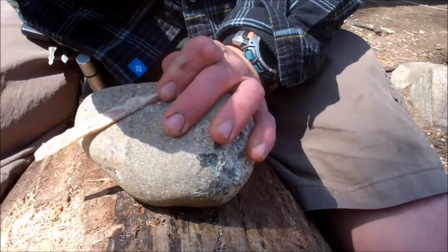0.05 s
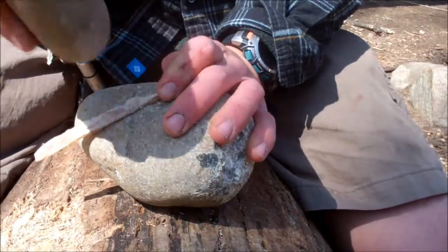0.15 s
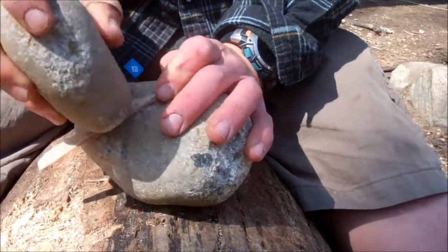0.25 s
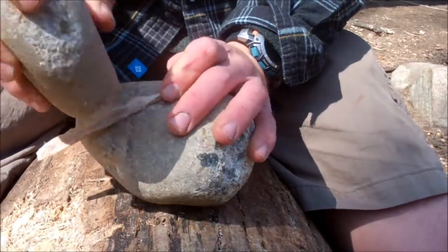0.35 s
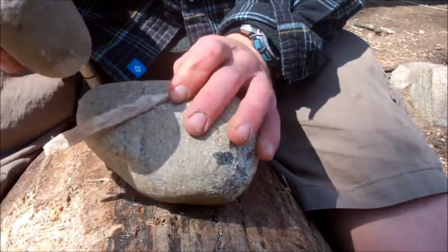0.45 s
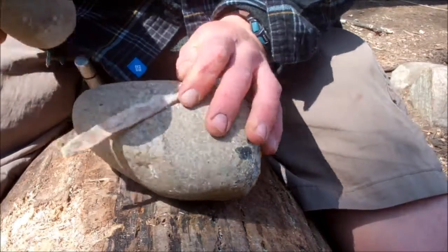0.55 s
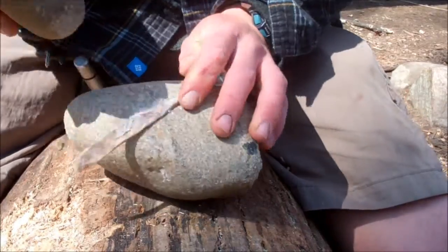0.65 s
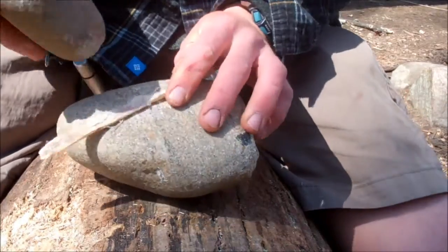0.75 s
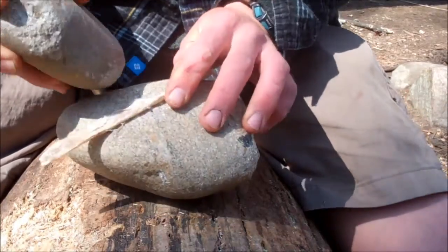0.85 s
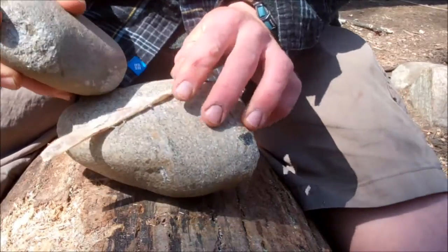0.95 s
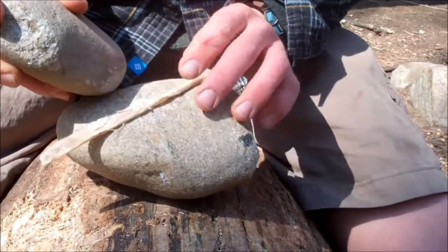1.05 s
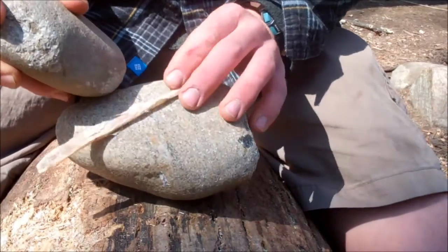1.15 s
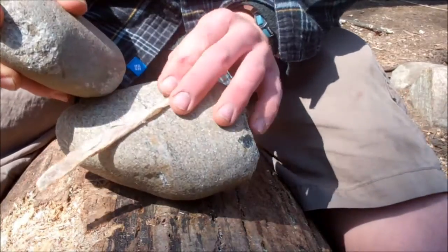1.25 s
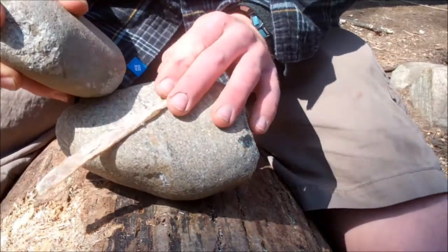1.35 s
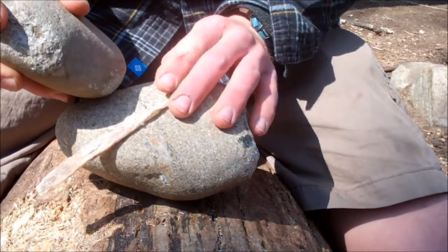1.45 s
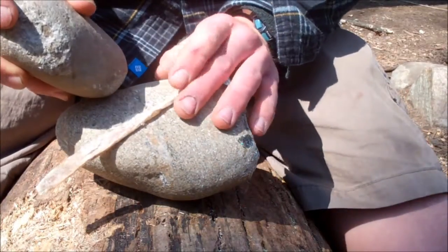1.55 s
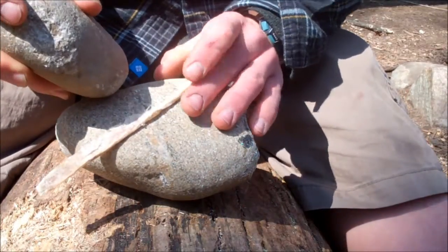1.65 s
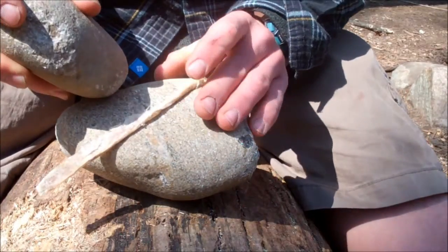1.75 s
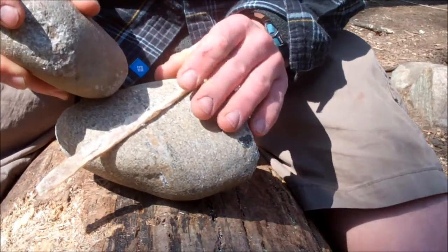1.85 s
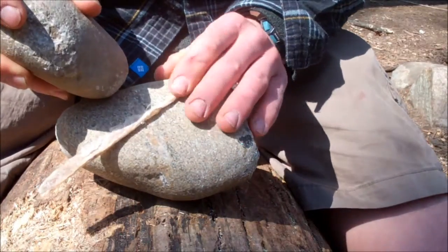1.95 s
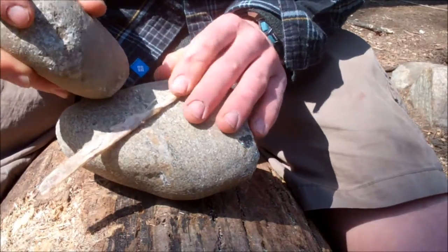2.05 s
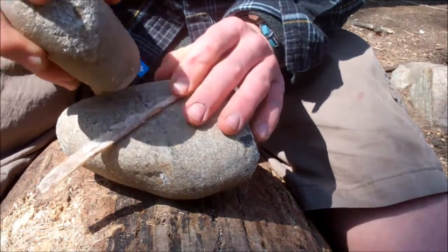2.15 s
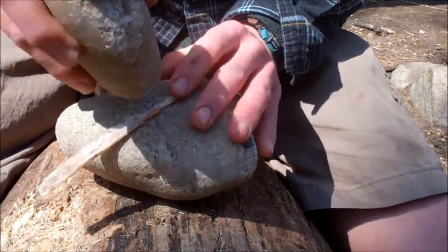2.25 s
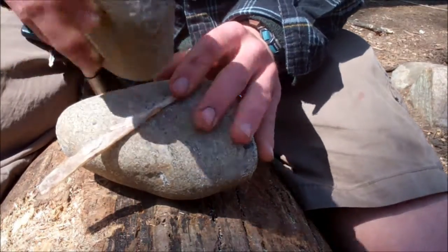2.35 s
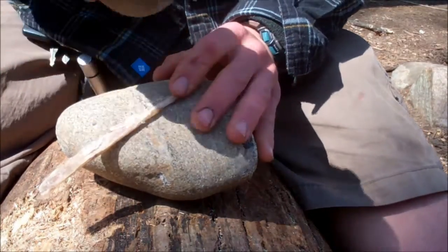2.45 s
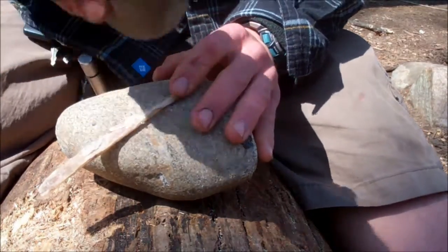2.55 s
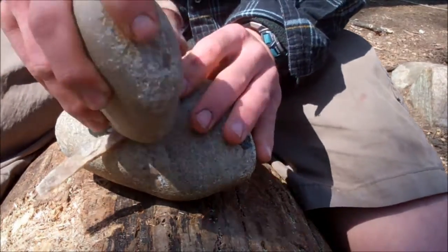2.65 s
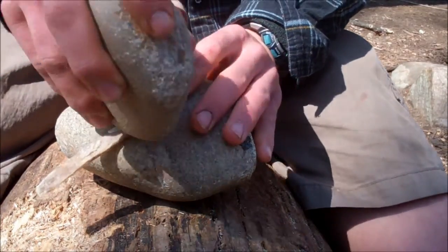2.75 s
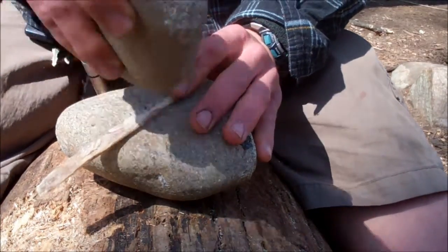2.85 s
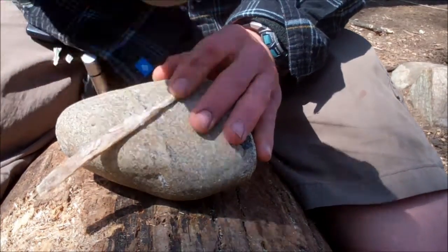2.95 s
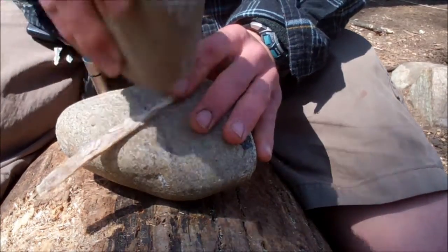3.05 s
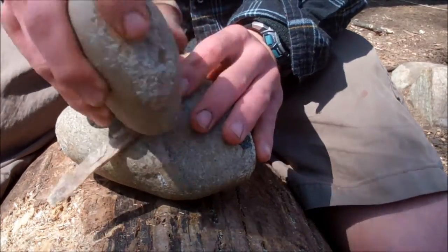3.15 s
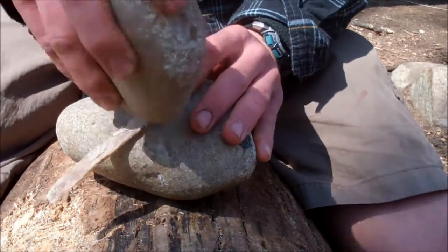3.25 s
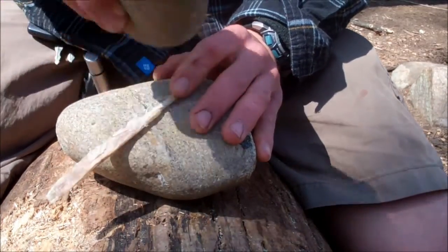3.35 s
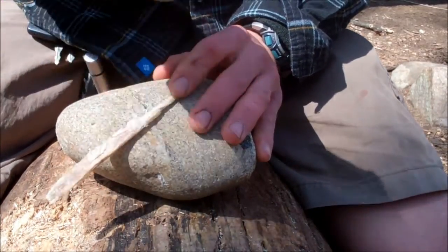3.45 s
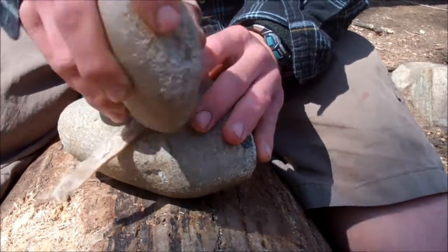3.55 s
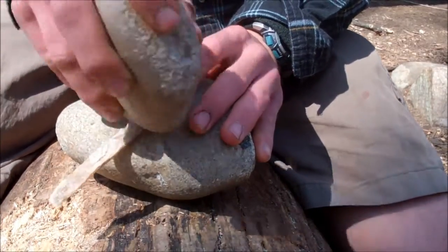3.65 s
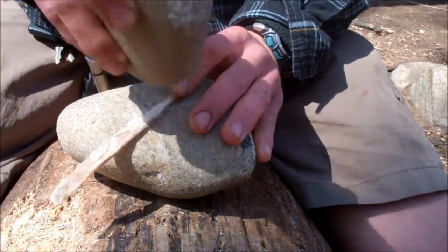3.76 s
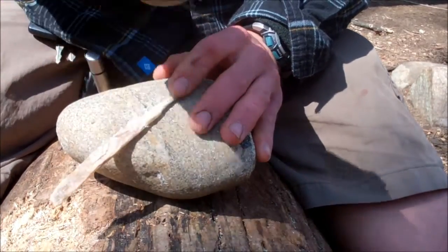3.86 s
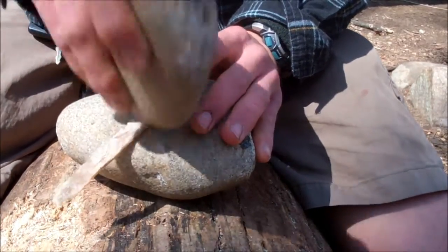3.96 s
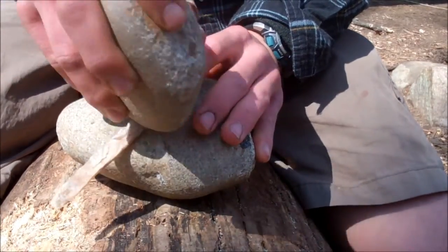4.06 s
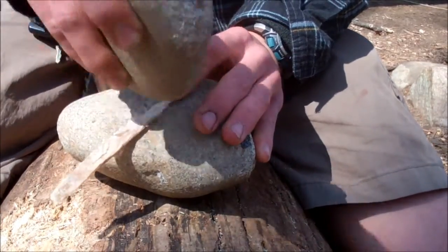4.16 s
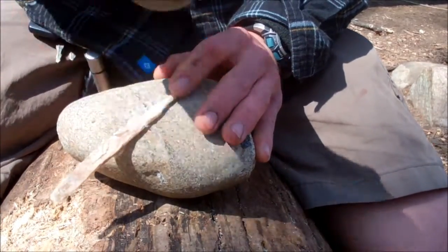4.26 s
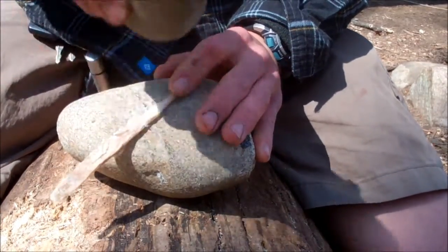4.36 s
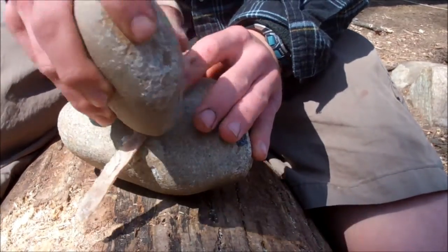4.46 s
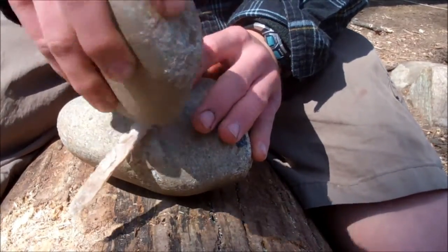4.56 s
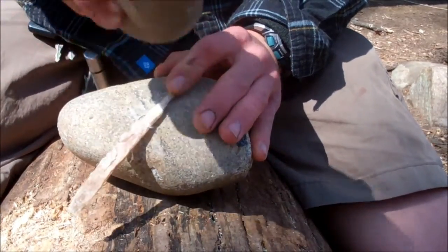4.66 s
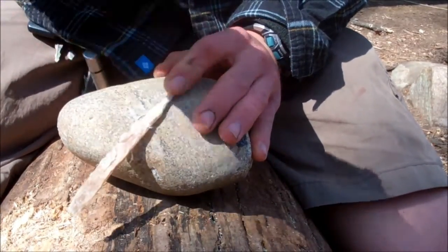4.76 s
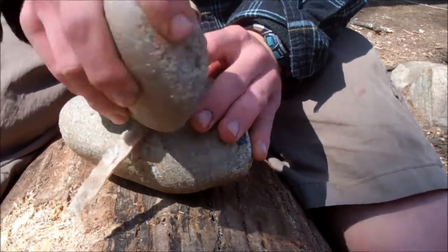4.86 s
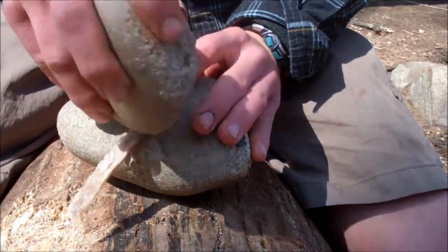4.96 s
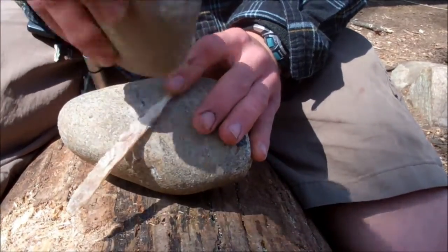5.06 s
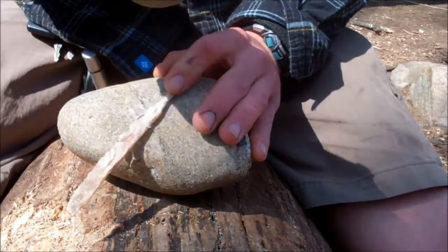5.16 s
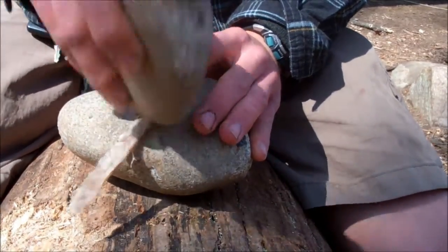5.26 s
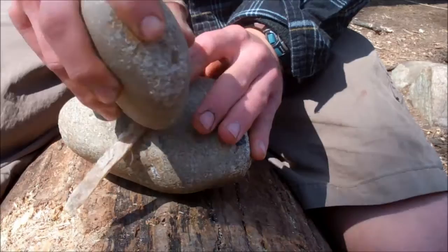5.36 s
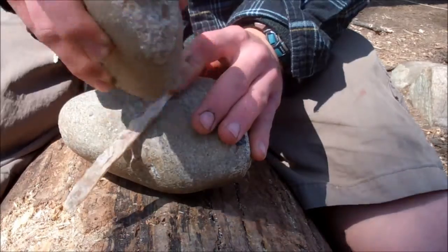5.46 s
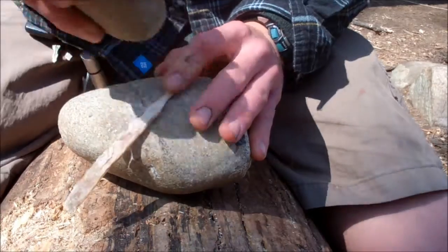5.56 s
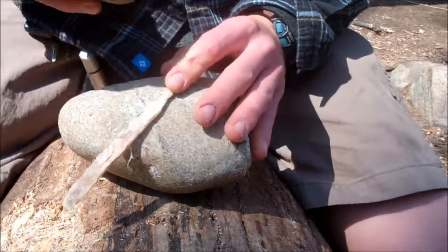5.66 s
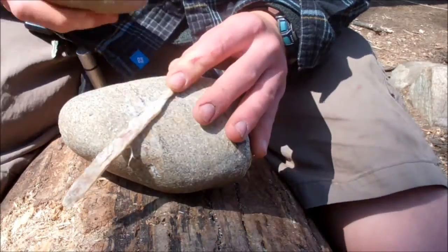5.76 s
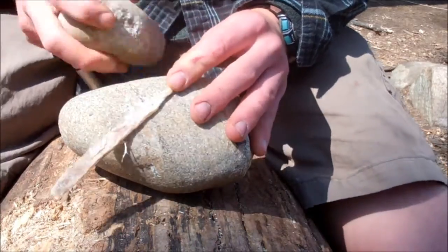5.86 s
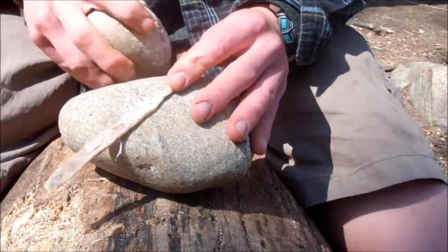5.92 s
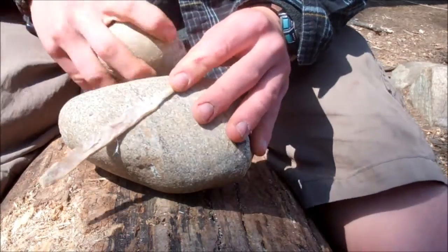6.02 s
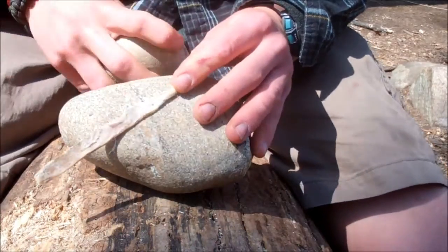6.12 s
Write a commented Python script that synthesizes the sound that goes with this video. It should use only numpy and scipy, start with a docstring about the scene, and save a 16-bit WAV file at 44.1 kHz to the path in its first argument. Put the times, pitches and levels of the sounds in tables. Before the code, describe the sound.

Outdoors, hard overloaded stone knocks with a crunchy edge and short hollow log thump. After an early blow and a small high clack comes a quiet gap of sleeve rustle, fine ticks and faint squeaks, then steady pounding until just past five seconds. Close microphone, almost no reverberation, low wind and soft distant rushing behind, ducking under the blows.

```python
"""Pounding sinew outdoors

A hand stone pounds a strip of sinew on an anvil stone resting on a log, close to the microphone.
Blows are dying sines with bursts of noise; they overload the input and make the gain control duck
a bed of coloured noise: distant wash, wind and hiss. Between blows, shaped noise makes sleeves rustle,
a hand rub the stone, dry fibres tick and thin whistles squeak."""
import sys
import numpy as np
from scipy import signal
from scipy.io import wavfile
from scipy.ndimage import uniform_filter1d, minimum_filter1d

SR = 44100
rng = np.random.default_rng(int(sys.argv[2]) if len(sys.argv) > 2 else 0)


def bounce(signal):
    """Save signal as a 16-bit WAV file at the path given by the first command-line argument."""
    frames = np.transpose(np.atleast_2d(signal))
    limited = np.clip(frames, -1, 1)
    pcm = np.round(limited * 32767).astype(np.int16)
    wavfile.write(sys.argv[1], SR, pcm)


N = 272979  # samples

# All source levels are set ahead of the input clipping and gain control.
# Colour tables give relative levels; noise() evens the result to unit RMS.


def gain_of(db):
    """Amplitude factor for a level in dB."""
    return 10 ** (np.asarray(db) / 20)


def evened(x):
    """Scale to unit RMS."""
    return x / np.sqrt(np.mean(x ** 2) + 1e-20)


def read(points, hz):
    """Read a curve of (f/Hz, value) points along a logarithmic frequency axis."""
    f, value = np.transpose(points)
    return np.interp(np.log(hz + 1), np.log(f + 1), value)


def colour(points):
    """Spectral gain as a function of frequency, from (f/Hz, level/dB) points."""
    return lambda hz: gain_of(read(points, hz))


def alike(amount):
    """The same left-right likeness at every frequency."""
    return lambda hz: np.full_like(hz, amount)


def follow(rows):
    """Gain along a level curve of (t/s, level/dB), at -120 dB outside it."""
    s, db = np.transpose(rows)
    return gain_of(np.interp(np.arange(N) / SR, s, db, -120, -120))


def strokes(rows):
    """Gain of movements that rise, hold and fall."""
    fade_db = -20.5  # each movement starts and ends this far under its top
    total = np.zeros(N)
    for s, rise, hold, fall, db in rows:
        top, release = s + rise, s + rise + hold
        total += follow([(s, db + fade_db), (top, db), (release, db), (release + fall, db + fade_db)])
    return total


def swells(rows):
    """Gain of bell-shaped swells."""
    t = np.arange(N) / SR
    return sum(gain_of(db) * np.exp(-2 * ((t - s) / half) ** 2) for s, half, db in rows)


def add(mix, s, sound):
    """Mix a sound in from s seconds on, cut at the end of the scene."""
    part = mix[..., round(s * SR):][..., :sound.shape[-1]]
    part += sound[..., :part.shape[-1]]


def noise(gain, same, size, patchy_db, flicker_db):
    """Two-channel noise of a given colour, with drifting patches and a flicker shared by all bins."""
    hop, hz = size // 4, np.fft.rfftfreq(size, 1 / SR)
    a, b, c, d, patches = rng.standard_normal((N // hop + 5, len(hz), 5)).T
    flicker = rng.standard_normal(patches.shape[1])
    patches = uniform_filter1d(patches, size=10, axis=0)  # across frequency
    patches = evened(uniform_filter1d(patches, size=12, axis=1))  # along time
    like = np.clip(same(hz), -1, 1)[:, None]
    left, other = a + 1j * b, c + 1j * d
    right = like * left + np.sqrt(1 - like ** 2) * other
    spectrum = np.array([left, right]) * gain(hz)[:, None]
    spectrum *= gain_of(patchy_db * patches + flicker_db * flicker)
    return evened(signal.istft(spectrum, nperseg=size, noverlap=size - hop)[1][:, :N])


def ring(modes, t, pitch=1):
    """Sum of dying sines, each falling 60 dB in its t60; only the sign of the first swing counts."""
    total = np.zeros(len(t))
    for hz, db, t60, swing in modes:
        total += np.sign(swing) * gain_of(db - 60 * t / t60) * np.sin(2 * np.pi * hz * pitch * t)
    return total


# Microphone hiss colour: f/Hz, level/dB per Hz
HISS_COLOUR = [(1500, -24.5), (3000, -1.5), (5000, -3), (8000, -4), (11000, -4), (14000, -1.5)]


def hiss():
    """The microphone's own steady noise, nearly independent left and right."""
    sound = noise(colour(HISS_COLOUR), alike(.11), size=1024, patchy_db=1.5, flicker_db=.3)
    return sound * gain_of(-55)


# Wind colour: f/Hz, level/dB per Hz
WIND_COLOUR = [(12, -27), (25, -14.5), (50, -5.5), (80, -5), (118, 3.5), (170, -7), (220, -9.5), (300, -37),
               (480, -89.5)]
# Gusts: peak t/s, half length/s, level/dB
WIND_GUSTS = [(.5, 0.17, -64), (2.96, 0.089, -62), (4.4, 0.28, -53), (5.2, 0.11, -43.5),
              (5.72, 0.16, -51.5), (6.12, 0.16, -50.5)]


def wind():
    """Lumpy low noise, a steady floor with bell-shaped gusts on top."""
    sound = noise(colour(WIND_COLOUR), alike(.9), size=2048, patchy_db=2.5, flicker_db=1.5)
    return sound * (gain_of(-57) + swells(WIND_GUSTS))


# Distant wash colour: f/Hz, level/dB per Hz
WASH_COLOUR = [(90, -33), (150, -4.5), (310, -9), (600, -9.5), (900, -7), (1340, -10), (1550, -14),
               (2000, -19), (3000, -29), (5000, -47)]
# Distant wash level curve: t/s, level/dB
WASH_CURVE = [(0.0, -54.5), (0.53, -46), (0.75, -51.5), (3.4, -50.5), (3.7, -51.5), (4.7, -45.5),
              (4.95, -49.5), (5.6, -48), (6.19, -52.5)]
# Stereo width of the wash: f/Hz, left-right likeness (0 independent, 1 identical)
WASH_LIKENESS = [(60, 0.69), (180, 0.82), (550, 0.9), (1640, 0.67), (4960, 0.03), (15000, 0.36)]
# Swells of a brighter part of the wash: peak t/s, half length/s, level/dB
SWISH_SWELLS = [(.45, 0.33, -50.5), (1.12, 0.21, -62), (1.7, 0.31, -57), (2.8, 0.43, -62), (4.1, 0.19, -64),
                (4.55, 0.28, -49.5), (5.7, .2, -61.5), (6.2, 0.38, -55.5)]
# Colour of that brighter part: f/Hz, level/dB per Hz
SWISH_SPECTRUM = [(900, -36), (1600, -5.5), (2400, -3.5), (3500, -9), (6000, -19.5)]


def distant_wash():
    """A broad noise bed rides a level curve while a brighter band of it swells and sinks."""
    def likeness(hz):
        return read(WASH_LIKENESS, hz)
    wash = noise(colour(WASH_COLOUR), likeness, size=1024, patchy_db=2, flicker_db=.8)
    swish = noise(colour(SWISH_SPECTRUM), likeness, size=1024, patchy_db=2, flicker_db=1.2)
    return wash * follow(WASH_CURVE) + swish * swells(SWISH_SWELLS)


# Sleeve cloth colour: f/Hz, level/dB per Hz
CLOTH_COLOUR = [(1470, -50.5), (2500, -11), (3080, -8), (4450, -4.5), (7110, -7.5), (9910, -2.5),
                (14000, 1.5)]
# Sleeve movements: start t/s, rise/s, hold/s, fall/s, top level/dB
SLEEVE_MOVES = [(.31, 0.011, .005, .03, -43.5), (.42, 0.15, .01, .12, -47.5), (.71, 0.053, .01, .05, -46.5),
                (1.02, 0.026, 0.018, 0.092, -52), (1.165, 0.013, 0.063, .15, -44.5),
                (2.2, 0.033, 0.098, .02, -62.5), (2.53, 0.031, .08, .01, -52.5),
                (2.9, 0.19, .01, .01, -64.5), (3.21, .024, 0.0026, .01, -53), (3.4, 0.14, .01, .01, -54.5),
                (3.665, .018, .005, .04, -51.5), (3.9, 0.11, 0.0092, .01, -58.5),
                (4.09, 0.0097, .004, .02, -46), (4.5, .025, 0.011, .04, -45),
                (4.64, 0.044, 0.015, .15, -65), (4.918, 0.011, .03, .09, -47.5),
                (5.37, 0.03, .01, .02, -44), (5.5, .14, 0.11, .06, -56), (5.78, .028, 0.0077, .05, -47.5),
                (5.85, 0.038, 0.055, .13, -50), (6.03, 0.064, .01, .1, -45)]


def sleeves():
    """Cloth rustles in grainy bursts of noise."""
    cloth = noise(colour(CLOTH_COLOUR), alike(.65), size=256, patchy_db=2.5, flicker_db=3)
    return cloth * strokes(SLEEVE_MOVES)


# Skin sliding on stone: start t/s, rise/s, hold/s, fall/s, top level/dB
RUB_MOVES = [(1.36, .14, 0.087, 1, -53)]
# Resonances of the rub: f/Hz, width/Hz, relative level/dB
RUB_RESONANCES = [(8300, 500, -12), (10300, 1600, -8), (12130, 900, 0), (13450, 700, -3)]


def rubbing_hand():
    """A sliding hand hisses through a few high resonances."""
    def resonances(hz):
        return sum(gain_of(db) / (1 + (2 * (hz - f) / width) ** 2) for f, width, db in RUB_RESONANCES)
    rub = noise(resonances, alike(.3), size=1024, patchy_db=1.5, flicker_db=.7)
    return rub * strokes(RUB_MOVES)


# Thin short whistles: start t/s, length/s, f/Hz, level/dB
WHISTLES = [(0.808, 0.15, 3950, -77), (0.954, 0.2, 1286, -53), (1.549, 0.086, 1350, -56),
            (2.184, .1, 1350, -61), (2.55, 0.091, 4340, -53.5)]


def squeaks():
    """A narrow band of noise, faded in and out for a moment, makes each unsteady whistle."""
    out = np.zeros(N)
    for s, length, hz, db in WHISTLES:
        band = signal.butter(1, [hz * .975, hz * 1.025], "band", fs=SR)
        settled = signal.lfilter(*band, rng.standard_normal(SR // 5))[-round(length * SR):]
        tone = evened(settled)
        add(out, s, gain_of(db) * tone * signal.windows.tukey(len(tone), .3))
    return out


# Dry fibres and grit: t/s, peak level/dB, centre f/Hz, decay time constant/s
FIBRE_TICKS = [(0.2802, -18.5, 8850, 0.003), (0.303, -30, 9100, 0.001), (.728, -38, 10000, 0.00088),
               (.8262, -23, 11000, 0.00021), (1.029, -24, 11100, 0.00032), (2.392, -40, 12000, 0.00086),
               (2.554, -38, 5940, 0.0011), (2.58, -33, 4940, 0.0012), (2.597, -32, 5000, 0.0011),
               (3.23, -37.5, 10500, 0.0012), (5.868, -38.5, 2200, 0.00092), (5.908, -34, 3400, 0.0032),
               (5.99, -40, 3750, 0.0011), (6.091, -38, 11500, .0008), (6.115, -32, 4500, .0015),
               (6.12, -31, 5200, 0.00093)]


def ticks():
    """Each tick is a tiny dying burst of noise through a band more than an octave wide."""
    out, t = np.zeros((2, N)), np.arange(800) / SR
    for s, peak_db, hz, length in FIBRE_TICKS:
        shared = rng.standard_normal((1, len(t)))
        sides = rng.standard_normal((2, len(t)))
        band = signal.butter(2, np.clip([hz / 1.8, hz * 1.6], 100, 20000), "band", fs=SR)
        burst = signal.lfilter(*band, (shared + .5 * sides) * np.exp(-t / length))
        add(out, s, gain_of(peak_db) * burst / abs(burst).max())
    return out


# The log under the anvil: f/Hz, level/dB, t60/s, first swing (sign)
LOG_MODES = [(123.93, -28.5, 0.37, 1), (256.3, 2, 0.18, 0.97), (377, -2.5, 0.097, -1),
             (492, -8, 0.073, 0.92), (630, -19, 0.047, -1.5)]


def log_ring(t):
    """The wooden log swells up in some 10 ms, rings, and breaks off after a tenth of a second."""
    return ring(LOG_MODES, t) * (1 - np.exp(-t / .01)) / (1 + np.exp((t - .097) / .007))


# A hand nudges the log: t/s, gain on the log ring/dB
LOG_NUDGES = [(4.666, -46), (6.113, -40.5)]


def nudges():
    """A nudge of the hand sets the log ringing softly."""
    out, log = np.zeros((2, N)), log_ring(np.arange(SR // 3) / SR)
    for s, db in LOG_NUDGES:
        add(out, s, gain_of(db) * log)
    return out


def crunch(t, lead):
    """Crushed fibres: a treble-heavy noise snap that peaks at lead, its sides differing most up high."""
    rise_s, fall_s = .00052, .0014  # time constants
    grains = rng.standard_normal((3, len(t)))
    shared = uniform_filter1d(grains[:1], size=3)
    sides = np.diff(grains[1:], prepend=0)
    snap = signal.lfilter(*signal.butter(1, 1511, "high", fs=SR), shared + .3 * sides)
    return snap * np.exp(np.minimum((t - lead) / rise_s, (lead - t) / fall_s))


# The anvil knocking on its seat: f/Hz before the blow's pitch factor, level/dB, t60/s, first swing (sign)
KNOCK_MODES = [(887.6, 9, 0.0081, -1.423), (983.3, -8.5, 0.021, -0.19), (703, -14.5, 0.03, -1),
               (1222, -12.5, 0.02, -1)]
# The anvil stone itself, rung by bare stone: f/Hz, level/dB, t60/s, first swing (sign)
ANVIL_MODES = [(1412, -4, 0.02, -1), (1770, 13, 0.0082, -1), (1920, -6.5, 0.014, -1),
               (4540, -17.5, 0.004, -1), (5800, -10.5, 0.0055, -1)]
# The hand stone, rung the same way: f/Hz, level/dB, t60/s, first swing (sign)
HAND_STONE_MODES = [(2600, 0, 0.0099, 1), (2830, -2.5, 0.0076, 1), (3340, -8, 0.008, 1)]
# A thin high ring, strongest after the barest contact: f/Hz, level/dB, t60/s, first swing (sign)
PING_MODES = [(13910, 0, .11, 1)]
# Echo thrown back by ground and body: f/Hz, level/dB per Hz
ECHO_COLOUR = [(250, -28.5), (600, 6), (1000, 2.5), (2500, -8.5), (4000, -22), (6000, -32.5)]
# Short treble noise tail after each blow: f/Hz, level/dB per Hz
TREBLE_TAIL_COLOUR = [(2500, -15), (5000, -2), (9000, -3), (14000, -6)]
# Hammer blows: t/s, knock level/dB, knock pitch factor, side struck (+-1, flips the knock's swing), then
# level/dB of: log ring, anvil ring, hand stone ring, ping, push, crunch, echo
HAMMER_BLOWS = [(0.226, 7, 1.165, 1, -5.5, -1, -18, -64.5, -1.5, -6.5, -12),
                (0.9149, -9.5, 1.104, -1, -24.5, -42, -4, -37.5, -40, -28.5, -26.5),
                (2.6456, 11, 1.01, 1, -10.5, -4.5, -20.5, -65.5, -5.5, -9, -23),
                (3.1142, 5.5, 0.895, 1, -8, -19.5, -14.5, -60.5, -38.5, -2, -31),
                (3.5691, 8.5, 1.02, 1, -7, -9.5, -23.5, -76, -9, -1.5, -23.5),
                (3.9999, 12, 1.02, 1, -5, -4.5, -19, -57.5, -1, -1.5, -19.5),
                (4.4320, 11.5, 1.002, 1, -1.5, 0.5, -1.5, -49, -1, 1, -13),
                (4.8792, 11, 1.008, 1, -7, -7, -21, -61.5, -3.5, -0.5, -26.5),
                (5.3004, 15, 1.022, 1, -4.5, -1.5, -22.5, -75, 0.5, -2, -24.5)]


def blows():
    """Fibres crunch, the anvil knocks and sinks, bare stone rings, the log swells, noisy tails die away."""
    out, t = np.zeros((2, N)), np.arange(SR // 3) / SR
    lead = .003  # s, the crunch starts building this early
    tail_db = -30  # treble tail relative to the log ring's setting
    lean_left = np.array([[.5], [-.5]])  # splits a left-right level difference in dB
    echo = noise(colour(ECHO_COLOUR), alike(.4), size=256, patchy_db=2.5, flicker_db=4.5)
    treble_tail = noise(colour(TREBLE_TAIL_COLOUR), alike(.5), size=256, patchy_db=2, flicker_db=2.5)
    log, anvil, ping = log_ring(t), ring(ANVIL_MODES, t), ring(PING_MODES, t)
    hand_stone = ring(HAND_STONE_MODES, t) * (1 - np.exp(-t / .00031))
    push = -t / .0009 * np.exp(1 - t / .0009)  # one-sided: the stone moves away from the microphone
    contact = np.hanning(12) / np.hanning(12).sum()  # the force builds over a quarter millisecond
    for (s, blow_db, pitch, side, log_db, anvil_db, hand_db,
         ping_db, push_db, crunch_db, echo_db) in HAMMER_BLOWS:
        knock = ring(KNOCK_MODES, t, pitch) * (1 - np.exp(-t / .00045)) ** 2  # sinew cushions the first swing
        low = np.sign(side) * gain_of(blow_db) * knock + gain_of(log_db) * log
        low = low + gain_of(push_db + 1.64 * lean_left) * push
        stones = gain_of(anvil_db) * anvil + gain_of(hand_db) * hand_stone
        body = low + gain_of(3 * lean_left) * stones
        add(out, s, signal.lfilter(contact, 1, body) + gain_of(ping_db) * ping)
        after = slice(round(s * SR), round(s * SR) + len(t))
        add(out, s, gain_of(echo_db - 60 * t / .089) * echo[:, after])
        add(out, s, gain_of(log_db + tail_db - 60 * t / .085) * treble_tail[:, after])
        add(out, s - lead, gain_of(crunch_db) * crunch(t, lead))
    return out


def scene():
    """Everything that reaches the input, from the background to the blows."""
    background = hiss() + wind() + distant_wash()
    handling = sleeves() + rubbing_hand() + squeaks() + ticks() + nudges()
    return background + handling + blows()


def low_pass(x, hz):
    """Steep linear-phase band limit."""
    return signal.oaconvolve(x, signal.firwin(511, hz, window=("kaiser", 9), fs=SR)[None], "same")


def record(dry):
    """The input clips; gain control reacts too late for the knock, holds, then recovers; two band limits."""
    clipped = np.clip(dry, -1, 1)
    power = uniform_filter1d((clipped ** 2).mean(0), size=200, origin=99)  # over the last 4.5 ms
    power_db = 10 * np.log10(abs(power) + 1e-12)
    held_db = -minimum_filter1d(-power_db, size=7601, origin=3800)  # keeps each peak for a sixth of a second
    fall = np.arange(N) * 48. / SR  # the sensed level falls back by at most 48 dB a second
    sensed_db = np.maximum.accumulate(held_db + fall) - fall
    over_db = np.maximum(sensed_db + 17, 0)  # above a threshold of -17 dB
    over_db = np.maximum(over_db, 10 - fall)  # still recovering from an earlier blow
    keep = np.exp(-1 / (.018 * SR))  # the gain moves with an 18 ms time constant
    smooth_db = signal.lfilter([1 - keep], [1, -keep], over_db, zi=[over_db[0] * keep])[0]
    ducked = clipped / gain_of(.85 * smooth_db)  # dB of cut per dB over
    centred = signal.lfilter(*signal.butter(1, 18, "high", fs=SR), ducked)  # coupling passes no steady offset
    loud = np.clip(1.14 * low_pass(centred, 14170), -1, 1)  # the filter overshoots and clips again
    return low_pass(loud, 15558)


dry = scene()
out = record(dry)
bounce(out)
```